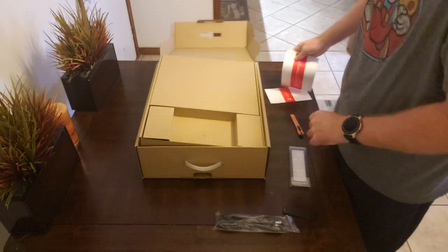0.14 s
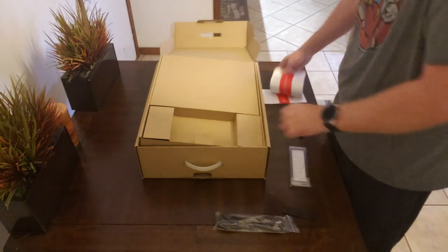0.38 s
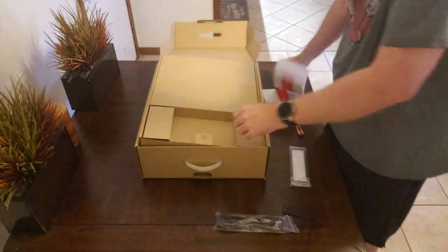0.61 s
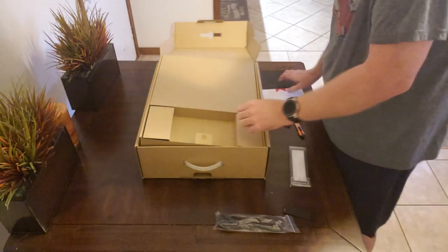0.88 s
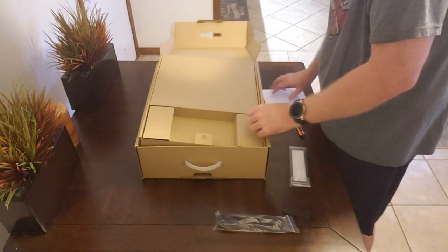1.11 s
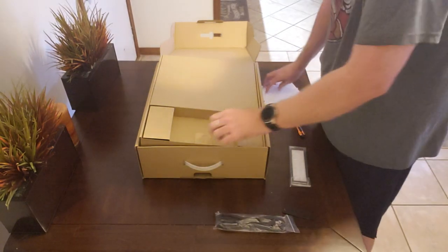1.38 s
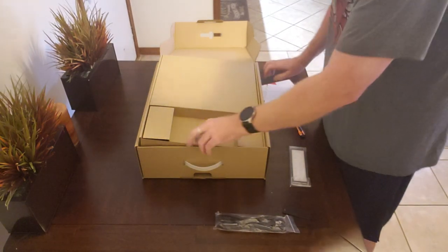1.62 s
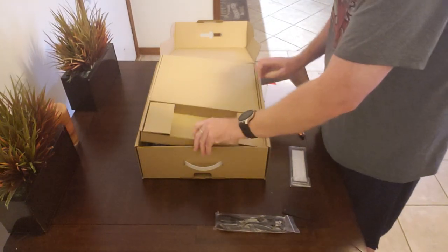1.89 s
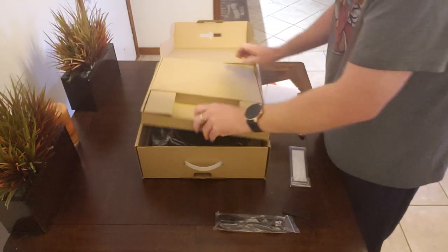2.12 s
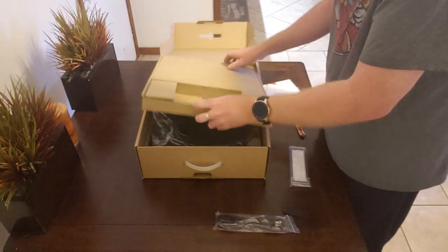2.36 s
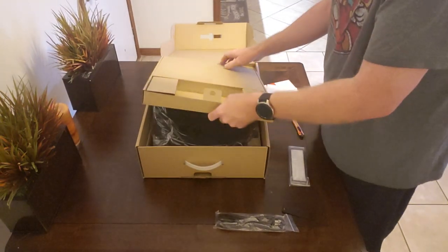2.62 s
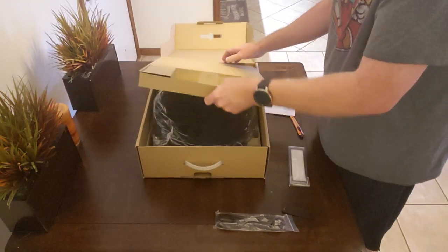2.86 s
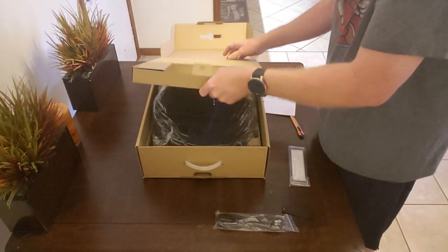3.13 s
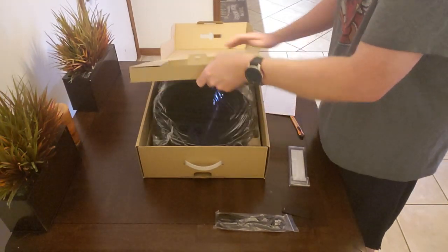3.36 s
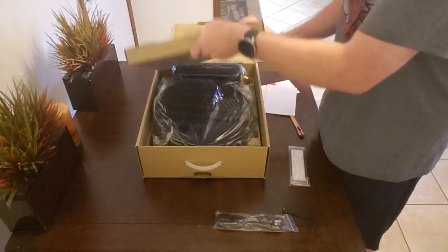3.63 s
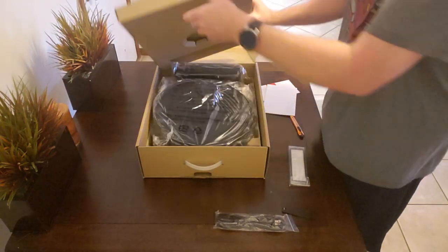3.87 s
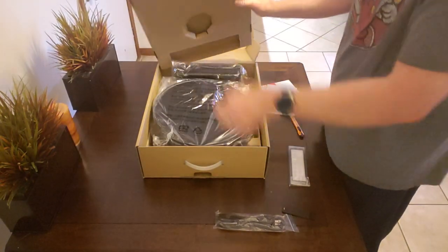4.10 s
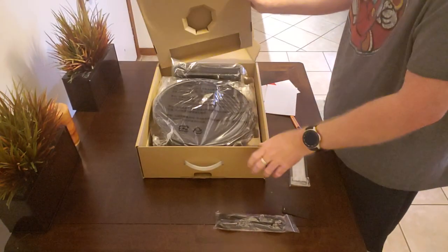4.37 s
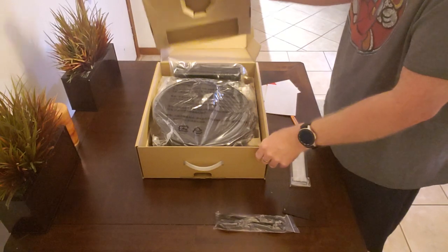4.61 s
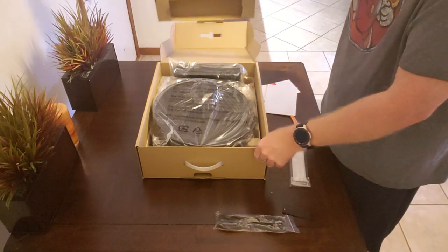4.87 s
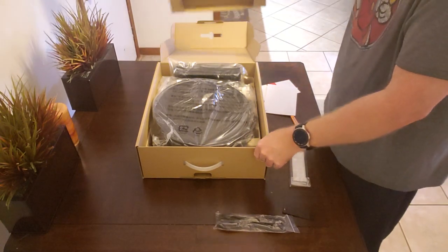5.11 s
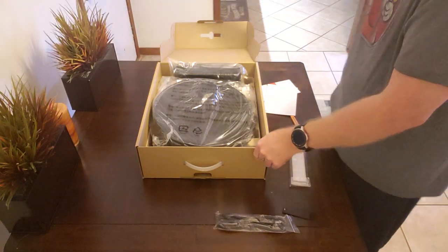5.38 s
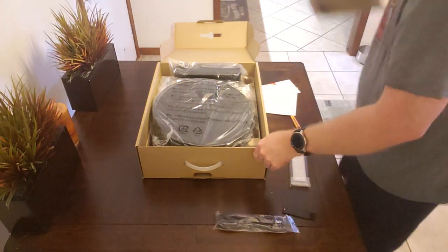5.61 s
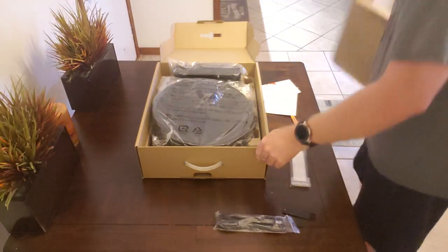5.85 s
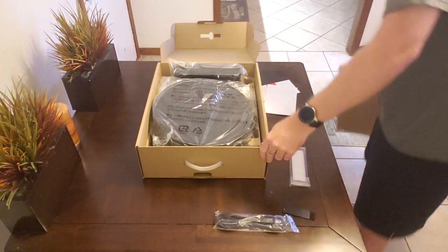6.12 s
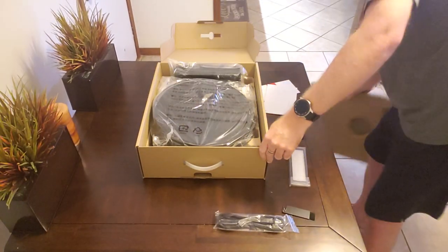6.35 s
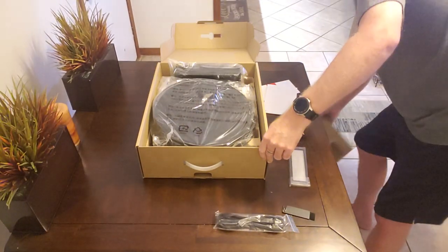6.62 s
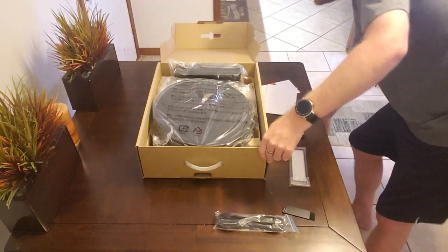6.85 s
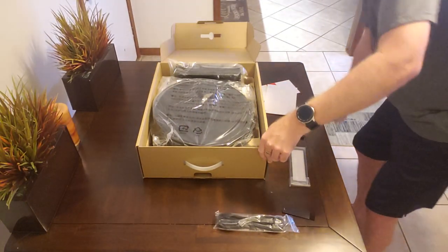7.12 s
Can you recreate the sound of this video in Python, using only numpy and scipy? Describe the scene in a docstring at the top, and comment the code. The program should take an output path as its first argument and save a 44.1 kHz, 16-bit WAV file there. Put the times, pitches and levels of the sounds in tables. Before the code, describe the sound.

Over a low appliance hum, hands rub and lift stiff cardboard with dry ticks and scuffs, then after a lull the board bangs onto tile.

```python
"""An appliance hums in a hard-walled room while hands lift a cardboard insert out of a box on a table,
turn it over and drop it on a tiled floor. Two close microphone ports listen.
Noise slips through resonances make board rub on board and skin; short rings make flaps tick and knock.
Low sine swells are feet thudding now and then and, at the end, the board landing.
Wavering sines are the hum, filtered noise the air, decaying noise the echoes of the room."""
import sys
import numpy as np
from scipy import signal
from scipy.fft import rfft, irfft, next_fast_len
from scipy.io import wavfile
from scipy.ndimage import uniform_filter1d

SR = 44100
rng = np.random.default_rng(int(sys.argv[2]) if len(sys.argv) > 2 else 0)


def gain_from_db(level_db):
    """Convert decibel levels to linear amplitude factors (20 dB per decade)."""
    decades = np.asarray(level_db, float) / 20
    return 10 ** decades


def wav_out(sig):
    """Save sig, one row per channel (or a flat mono array), as 16-bit PCM at SR to the path in sys.argv[1]."""
    wavfile.write(sys.argv[1], SR, np.round(np.clip(np.atleast_2d(sig).T, -1, 1) * 32767).astype(np.int16))


N = 318887
T = np.arange(N) / SR


def read(table, hz):
    """Read a (Hz, value) table joined on a log-frequency axis."""
    f, v = np.transpose(table)
    return np.interp(np.log(np.maximum(hz, 1)), np.log(f), v)


def colour(x, table):
    """Shape a sound by a (Hz, dB) table."""
    size = next_fast_len(N)
    gain = gain_from_db(read(table, np.fft.rfftfreq(size, 1 / SR)))
    return irfft(rfft(x, size) * gain, size)[..., :N]


def unit(x):
    """Scale to rms 1."""
    return x / np.sqrt(np.mean(x ** 2))


def walk(rate):
    """Random levels held 1 / rate s and slewed twice; spread near 1."""
    k = int(SR / rate)
    held = np.repeat(rng.standard_normal(N // k + 1), k)
    return 0.95 * uniform_filter1d(uniform_filter1d(held, k), k)[:N]


def ring(x, modes):
    """Pass an excitation through (Hz, width Hz, dB) resonances of alternating sign."""
    out = 0
    for k, (hz, width, db) in enumerate(modes):
        out = out + (-1) ** k * gain_from_db(db) * signal.lfilter(*signal.iirpeak(hz, hz / width, SR), x)
    return out


def pan(db):
    """Left and right gains for a level difference, left minus right."""
    return gain_from_db(np.array([db, -db]) / 2)


# How alike the two microphone ports hear.
# Each row: frequency in Hz, likeness from 0 to 1.
PORT_LIKENESS = [(30, 0.4), (60, 0.99), (130, 0.82), (300, 0.9), (600, 0.3), (1200, 0.12), (3000, 0),
                 (7000, 0)]


def two_ports(mid, side):
    """Mix two sounds into left and right: close ports agree in the bass and differ in the treble."""
    size = next_fast_len(mid.shape[-1])
    alike = np.clip(read(PORT_LIKENESS, np.fft.rfftfreq(size, 1 / SR)), 0, 1)
    shared = rfft(mid, size) * np.sqrt(1 + alike)
    opposed = rfft(side, size) * np.sqrt(1 - alike) * np.array([[1], [-1]])
    return irfft(shared + opposed, size)[:, :mid.shape[-1]] / np.sqrt(2)


# Microphone response to the hands and the board.
# Each row: frequency in Hz, gain in dB.
MIC_RESPONSE = [(100, -3.5), (6300, -1), (7400, -4.5), (8600, -9.5), (10500, -7), (15000, 1.5)]


def microphone(x):
    """Colour a sound as the microphone's frequency response does."""
    return colour(x, MIC_RESPONSE)


# The hands' side of the microphone.
# Each row: time in seconds, left minus right in dB.
HANDS_SIDE = [(0, 4.5), (1.3, 5.5), (1.7, 5), (4.4, 3.5), (4.7, 5.5), (5.2, 3.5), (6.9, 6.5), (7.23, 3.5)]


def hands_pan_db(t):
    """Level difference between the ports as the hands move from side to side."""
    return np.interp(t, *np.transpose(HANDS_SIDE))


# Spectrum of the empty room, before scaling to its overall level.
# Each row: frequency in Hz, relative level in dB per Hz.
AIR_SPECTRUM = [(18, -22), (30, -6.5), (52, 1.5), (80, -4), (125, -9.5), (160, -19.5), (205, -6.5),
                (340, -26), (700, -30.5), (1200, -44), (3600, -54), (6270, -37.5), (8300, -61.5),
                (16000, -50)]
# Lean of the background, hum included, towards one port.
# Each row: frequency in Hz, left minus right in dB.
BACKGROUND_PAN = [(30, 10), (60, 2.5), (125, 1.5), (500, 4), (4000, 9.5), (12000, 13.5)]


def air():
    """Rumble of the house and hiss of the microphones; alike in the bass, unrelated in the treble."""
    pair = []
    for x, sign in zip(two_ports(*rng.standard_normal((2, N))), (1, -1)):
        spectrum = [(hz, db + sign * read(BACKGROUND_PAN, hz) / 2) for hz, db in AIR_SPECTRUM]
        pair.append(colour(x, spectrum))
    level_db = -51.5 + 0.77 * walk(3.7)
    return gain_from_db(level_db) * unit(np.array(pair))


# Lines of the appliance.
# Each row: frequency in Hz, level in dB rms before panning, wavering in dB.
HUM_LINES = [(57.4, -53.5, 4.5), (120.2, -51.5, 1), (184.6, -56.5, 0.8), (247.7, -69, 3)]


def hum():
    """Mains and motor lines of an appliance; standing waves make them waver."""
    out = 0
    for hz, db, waver_db in HUM_LINES:
        level = np.sqrt(2) * gain_from_db(db + waver_db * walk(3.3))
        drift = 0.51 * waver_db * walk(4)  # radians
        lag = np.arccos(np.clip(read(PORT_LIKENESS, hz), 0, 1))  # between the ports, radians
        line = level * np.sin(2 * np.pi * hz * T + drift + np.array([[0], [lag]]))
        out = out + line * pan(read(BACKGROUND_PAN, hz))[:, None]
    return out


# Low thuds: feet and weight shifting on the floor, and at the end the dropped board landing.
# Each row: start in seconds, level in dB, frequency in Hz.
LOW_THUDS = [(0.838, -31, 64.4), (1.489, -36.5, 66), (1.818, -41, 48.4), (2.19, -30.5, 82.5),
             (2.637, -47, 101), (3.165, -28, 65), (3.238, -31, 69.4), (3.553, -33.5, 69),
             (3.737, -38, 82.4), (4.488, -30.5, 68), (5.158, -32, 91), (5.397, -27.5, 60.2),
             (5.457, -32, 45.8), (6.248, -52, 61), (6.769, -36.5, 56), (7.135, -26, 62)]


def thuds():
    """Slow soft pushes on the floor, felt as short low swells, wider than the hum."""
    out, t = np.zeros((2, N + SR)), T[:SR // 3]
    swell = np.e * t / 0.016 * np.exp(-t / 0.01)
    lag = np.array([[0], [1.1]])  # between the ports, radians
    for s, db, hz in LOW_THUDS:
        i = int(s * SR)
        out[:, i:i + len(t)] += gain_from_db(db) * swell * np.sin(2 * np.pi * hz * t + lag)
    return out[:, :N] * pan(5.)[:, None]


# How long the tiled room rings on.
# Each row: frequency in Hz, time to fall 60 dB in seconds.
ROOM_DECAY = [(200, 0.38), (1000, 0.27), (4000, 0.17), (8000, 0.087), (14000, 0.23)]


def room(x):
    """Dense echoes from tiles and walls; each octave dies at its own pace."""
    t = T[:SR // 3]
    noise = two_ports(*rng.standard_normal((2, len(t))))
    tail = 0
    for hz in 110 * 2. ** np.arange(8):
        band = signal.butter(2, [hz / np.sqrt(2), hz * np.sqrt(2)], "band", fs=SR, output="sos")
        tail = tail + signal.sosfilt(band, noise) * gain_from_db(-60 * t / read(ROOM_DECAY, hz))
    # the first echo, off the table, comes after a few milliseconds
    tail = tail * np.clip((t - .003) / 0.0013, 0, 1) * pan(4.)[:, None]
    tail = tail / np.sqrt(np.sum(tail ** 2) / 2)
    return signal.fftconvolve(x.mean(0)[None], tail, axes=1)[:, :N]


# Resonances of the hollow box and of the board.
# Each row: frequency in Hz, width in Hz, relative level in dB.
BOX_MODES = [(154.4, 62, 1), (240, 193, -0.5), (323, 90, 0), (424, 63, -4)]
BOARD_MODES = [(497, 90, -3), (624, 86, -1.5), (818, 100, -3), (994, 160, -5), (1128, 200, -5.5),
               (1426, 240, -9.5)]
# Ticks and knocks of the flaps, up to the drop on the tiles. Each row: start in seconds, ring peak in dB
# before panning and microphone, ring in Hz, body push in dB over that peak, bright grit in dB over that peak.
CONTACTS = [(0.241, -40, 1800, 1, -20), (0.734, -56, 1720, 2, -34), (0.828, -13, 1800, -27, -14),
            (0.834, -11.5, 1910, -22, -17), (1.188, -53, 6400, -14, -15), (1.699, -42.5, 1480, -2, -24),
            (1.713, -32.5, 1500, -18, -29), (1.716, -36, 3350, -8, -23), (1.868, -50, 2460, 0, -21),
            (1.979, -44.5, 1560, 3, -25), (2.183, -27, 6250, -6.5, -14), (2.187, -25.5, 1690, -6, -29),
            (2.377, -50, 1440, -11, -19), (2.446, -22, 2900, -22, -28), (2.586, -37, 1480, -7, -29),
            (2.659, -44.5, 1300, -1, -26), (2.741, -39.5, 1680, -24.5, -5), (2.975, -41.5, 1540, 5, -1),
            (2.88, -47.5, 6200, -15, -3), (3.242, -37.5, 1140, -16, -22), (3.347, -46, 5800, -12, -1),
            (3.695, -25.5, 1740, -14, -15), (3.739, -38, 1850, 3.5, -13.5), (3.788, -27.5, 2110, -15, -17),
            (3.839, -48, 2190, -6, -6), (3.863, -32, 5300, -10, -26), (3.882, -53, 6500, -20, 0),
            (3.929, -39, 2440, -11, -8), (4.059, -47, 2460, -17, -17), (4.146, -38, 2470, -35, -27),
            (4.189, -42, 4480, -29.5, -6), (4.201, -44, 4480, -30, -20), (4.224, -35.5, 1980, -15, -27),
            (4.29, -44.5, 2570, -19, -18), (4.305, -47, 4100, -16, -8), (4.324, -35, 2850, -30, -35),
            (4.444, -42.5, 6010, -9, -7), (4.544, -33, 6400, -27, -9), (4.679, -45, 3930, -17, -12),
            (4.759, -46.5, 6450, -18.5, 2), (4.794, -36.5, 6500, -18.5, -18), (4.947, -45.5, 6370, -22, -4),
            (5.237, -61, 1690, 7, -25.5), (5.418, -59, 1370, -11, -12.5), (5.72, -57, 6080, -6.5, -13),
            (6.889, -60, 5100, -18, -15.5), (7.004, -33, 1600, -9, -21.5), (7.058, -22, 1810, -2, -24),
            (7.144, -6.5, 1400, -1, -33)]


def taps():
    """Each contact is a few cycles of its own ring, a spit of grit and a slower push on box and board."""
    out, t = np.zeros((2, N + SR)), T[:SR // 16]
    noise = rng.standard_normal((len(CONTACTS), len(t)))
    for (s, db, hz, body_db, grit_db), grit in zip(CONTACTS, noise):
        i = int(s * SR)
        # brighter ticks come more from the left, 3 dB per octave
        pan_db = hands_pan_db(s) + 3 * np.log2(hz / 1500)
        burst = grit * (1 - np.exp(-t / 0.00015)) * np.exp(-t / 0.0025)
        push = grit * t * np.exp(-t / 0.0047)
        own_ring = ring(burst, [(hz, hz / 4.7, 0)])
        body = ring(push, BOARD_MODES) + gain_from_db(-8.5) * ring(push, BOX_MODES)
        spit = np.diff(burst, prepend=0)
        hit = 0
        for part, part_db in ((own_ring, 0), (body, body_db), (spit, grit_db)):
            hit = hit + gain_from_db(part_db) * part / np.abs(part).max()
        out[:, i:i + len(t)] += pan(pan_db)[:, None] * gain_from_db(db) * hit
    return microphone(out[:, :N])


def slips(share, spread_db):
    """Fibres catch and let go: a fine hiss with sparse larger slips of bounded size."""
    slipping = rng.random((2, N)) < share
    size_db = spread_db * np.minimum(rng.exponential(size=(2, N)), 2.7)
    return rng.standard_normal((2, N)) * (1 + slipping * gain_from_db(size_db))


def crackle(per_s, size, decay_s):
    """Sudden releases of the flutes: the force jumps and sinks back within a few hundredths of a second."""
    jumps = (rng.random(N) < per_s / SR) * size * np.minimum(rng.exponential(size=N), 3)
    return 1 + signal.lfilter([1], [1, -np.exp(-1 / (decay_s * SR))], jumps)


# The grip never quite rests.
# Each row: time in seconds, hollow box in dB, board in dB, corrugation rasp in dB.
GRIP_LEVELS = [(0, -72, -81.5, -81.5), (1.69, -67.5, -85, -85.5), (1.75, -60.5, -63.5, -60.5),
               (2.15, -59, -56.5, -64), (2.35, -54, -55, -62.5), (2.7, -64, -64, -68),
               (2.83, -62, -64, -74), (2.95, -55.5, -56, -59.5), (3.4, -63, -58, -60.5),
               (3.65, -60.5, -63, -62.5), (3.98, -66, -62.5, -64), (4.4, -66, -71, -74.5),
               (4.9, -68, -79, -84.5), (5.5, -66.5, -76, -86), (5.9, -65.5, -71, -81),
               (6.5, -63.5, -79, -91), (6.95, -66, -80, -94), (7.23, -64.5, -78.5, -89.5)]
# The strokes below: times are for 20 dB, zero or less acts as 1 ms; falls are further scaled by FALL_SHARE.
# Board shudders after a sudden contact. Each row: start in seconds, fall time in seconds,
# hollow box in dB, board in dB, corrugation rasp in dB, hiss in dB.
BOARD_SHUDDERS = [(0.243, 0.23, -49, -62, -62, -61.5), (0.831, 0.15, -45.5, -42.5, -30, -41),
                  (1.188, 0.4, -73, -82, -79.5, -71), (1.699, 0.36, -52.5, -57, -61.5, -58),
                  (1.713, 0.08, -45, -39.5, -46.5, -58.5), (2.182, 0.1059, -36, -42.5, -45.5, -41),
                  (2.448, 0.0538, -38.5, -42, -35.5, -37.5), (2.588, 0.07, -38.5, -39, -57, -56.5),
                  (2.74, 0.17, -68, -67, -63, -59), (3.696, 0.2449, -43.5, -43, -44.5, -46.5),
                  (4.144, 0.13, -64, -72, -63, -58), (4.535, .2, -67.5, -61, -52.5, -48),
                  (4.794, .12, -72, -64, -61.5, -55.5), (4.95, -0.02, -71.5, -76, -78, -58),
                  (5.133, 0.15, -58, -57, -80, -77.5), (5.238, 0.1, -65, -59.5, -77, -79.5),
                  (5.418, 0.1, -61.5, -67.5, -73, -60.5), (6.285, .08, -56, -70, -78, -75),
                  (6.889, .07, -52, -64, -72, -72), (7.005, 0.4, -47, -28, -39, -43),
                  (7.054, 0.14, -30, -27.5, -31, -30), (7.123, -0.12, -29.5, -15, -33, -43),
                  (7.131, 0.12, -27, -19, -25.5, -27.5)]
# Board slides on board or tile. Each row: loudest moment in seconds, rise time in seconds,
# fall time in seconds, board in dB, corrugation rasp in dB.
BOARD_SCRAPES = [(0.225, -0.24, 0.45, -60, -77), (0.755, .04, .08, -51, -61),
                 (0.874, 0.03, 0.1366, -40, -34.5), (1.883, 0.02, 0.15, -55.5, -60),
                 (2.42, 0.07, 0.38, -54.5, -52.5), (2.566, 0.04, -0.1, -58, -51),
                 (2.655, 0.17, -0.52, -54.5, -57), (3.008, -0.06, 0.1, -49, -52.5),
                 (3.53, .09, .08, -48, -50.5), (4.297, 0.22, 0.13, -54.5, -58.5),
                 (4.455, -0.2, .08, -59, -61), (4.512, 0, .06, -53.5, -79), (4.619, 0.14, 0.08, -49.5, -52),
                 (5.605, .1, 0.24, -65.5, -71), (6.111, 0.21, 0.25, -70.5, -67),
                 (6.291, 0.34, 0.2, -67.5, -77.5), (6.565, 0.1, 0.5, -70, -73), (6.705, .06, .09, -59, -76),
                 (7.031, 0.0237, .05, -24.5, -37), (7.096, 0.0558, .03, -35, -37),
                 (7.144, .02, .06, -19.5, -21), (7.172, .03, 0.24, -26, -28.5)]
# Hissing brushes: skin over the board, and at the end the hiss of the board landing. Each row: loudest
# moment in seconds, rise time in seconds, fall time in seconds, main hiss in dB, fine fibre hiss in dB.
HISSING_BRUSHES = [(0.02, .1, 0.2, -74, -75), (0.28, .04, 0.23, -63.5, -63), (0.45, .08, .14, -56, -62),
                   (0.87, .04, .12, -42, -60), (1.381, 0.1, 0.15, -61, -66.5), (1.72, .02, .1, -69, -56),
                   (1.884, -0.01, 0, -58.5, -73), (2.02, 0, 0, -62, -77), (2.195, 0.0238, 0.07, -49, -43),
                   (2.4, 0.43, 0.76, -58, -60.5), (2.655, 0.2, .08, -60, -67),
                   (3.008, 0.02, 0.18, -50.5, -57), (3.341, 0.54, -1, -61, -70.5),
                   (3.532, 0.1, -0.7, -51.5, -57), (3.93, 0.4, .04, -52.5, -57.5), (4.04, .1, .1, -62, -67),
                   (4.296, 0.15, 0.34, -56.5, -63), (4.616, 0.01, 0.1251, -44.5, -50),
                   (5.159, 0.7, 0.57, -73, -77), (5.737, 0.3, 0.14, -68, -67), (6.111, 0.4, 0.2, -67, -79),
                   (6.291, 0.04, 0.1, -67, -74.5), (6.57, -0.4, 0.16, -66.5, -82),
                   (6.891, 0.03, -0.1, -67, -78), (7.142, .015, .06, -26, -48)]
# Fall time of each layer. In order: box, board, rasp, skin and fibre, as a share of the stroke's.
FALL_SHARE = [1.02, 0.98, 0.93, 0.81, 0.68]


def pressure():
    """Levels of box, board, rasp, skin and fibre: the grip plus every stroke's rise and fall in dB."""
    t = T[::32]
    silent = -140  # dB
    swell = 1.3  # slides and brushes ease off their top; 1 = straight in dB

    def carried(rasp):
        """Skin and fibre hiss that goes along with a rasp, in dB."""
        return rasp - 6.5, rasp - 21

    strokes = []
    for s, fall, box, board, rasp, hiss in BOARD_SHUDDERS:
        strokes.append((s, .005, fall, 1, (box, board, rasp, hiss, hiss - 8.5)))
    for s, rise, fall, board, rasp in BOARD_SCRAPES:
        strokes.append((s, rise, fall, swell, (board - 7, board, rasp, *carried(rasp))))
    for s, rise, fall, hiss, fibre in HISSING_BRUSHES:
        strokes.append((s, rise, fall, swell, (silent, silent, hiss - 9, hiss, fibre)))

    s, *grip = np.transpose(GRIP_LEVELS)
    layers = (*grip, *carried(grip[-1]))
    power = gain_from_db(np.array([np.interp(t, s, layer) for layer in layers])) ** 2
    for s, rise, fall, rounding, dbs in strokes:
        before = ((s - t) / max(rise, 1e-3)) ** 2
        after = np.abs(t - s) / max(fall, 1e-3) / np.array(FALL_SHARE)[:, None]
        away = np.where(t < s, before, after ** rounding)
        power = power + gain_from_db(np.array(dbs)[:, None] - 20 * away) ** 2
    return [np.interp(T, t, np.sqrt(p)) for p in power]


# Resonances of the corrugation rasp, the skin hiss and the fine fibre hiss.
# Each row: frequency in Hz, width in Hz, relative level in dB.
RASP_MODES = [(1637, 234, 4), (1840, 710, -0.5), (2420, 660, -1), (3304, 1480, -6.5)]
SKIN_MODES = [(4330, 3700, 3.5), (5300, 850, 0.5), (6145, 3100, 7)]
FIBRE_MODES = [(10580, 3400, 11.5), (13600, 1720, -19)]


def rubbing():
    """Slips ring box and board, rasp on the corrugation and hiss under the skin, in uneven gusts."""
    # one stream of slips drives every layer, so that a crackle is heard across the treble
    force = microphone(slips(0.0023, 7.8) * crackle(30., 0.51, 0.014))
    shared_gust, out = walk(40), 0
    layers = (BOX_MODES, BOARD_MODES, RASP_MODES, SKIN_MODES, FIBRE_MODES)
    for modes, level in zip(layers, pressure()):
        gust_db = 0.79 * shared_gust + 1.1 * walk(25)
        centre_hz = np.mean(modes, 0)[0]
        # a broad second resonance holds each layer to its own region
        rung = unit(ring(ring(force, modes), [(centre_hz, 0.48 * centre_hz, 0)]))
        out = out + level * gain_from_db(gust_db) * rung
    return two_ports(*out) * pan(hands_pan_db(T))


def scene():
    """Hands and board in the room, over low thuds, hum and air."""
    rub, hits = rubbing(), taps()
    echoes = room(gain_from_db(-9.5) * rub + gain_from_db(-0.5) * hits)
    near = rub + hits + echoes
    return near + thuds() + hum() + air()


def roll_off(x):
    """The treble ends steeply here."""
    return signal.sosfilt(signal.butter(12, 16970, fs=SR, output="sos"), x)


# Upper limit of what is heard.
# Each row: frequency in Hz, gain in dB.
TOP_CUT = [(15850, 0), (16050, -45)]


def record(dry):
    """The treble falls away steeply at the upper limit."""
    mix = colour(dry, TOP_CUT)
    return roll_off(mix)


dry = scene()
out = record(dry)
wav_out(out)
```